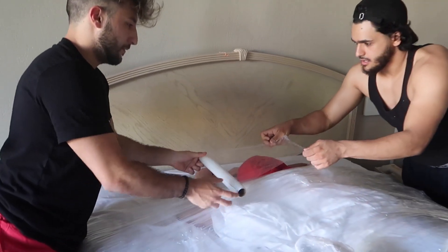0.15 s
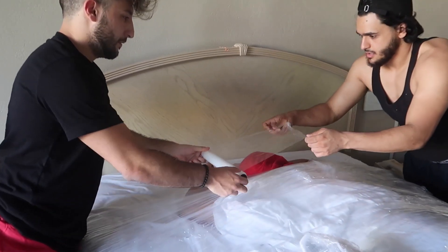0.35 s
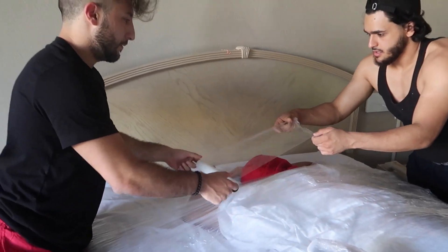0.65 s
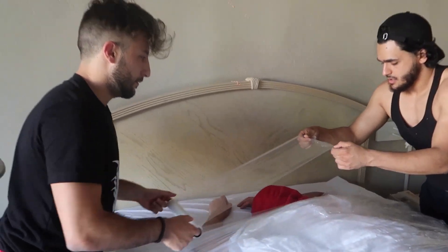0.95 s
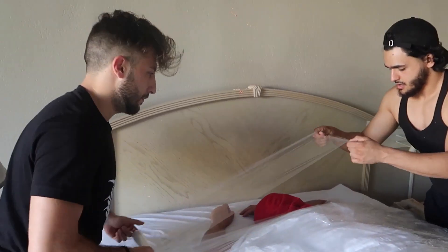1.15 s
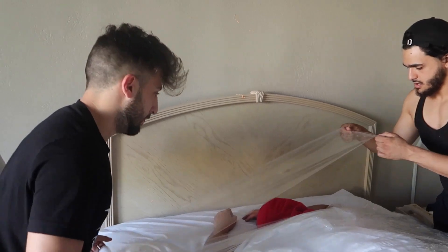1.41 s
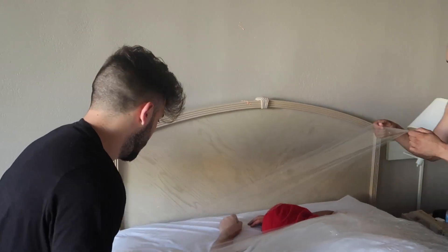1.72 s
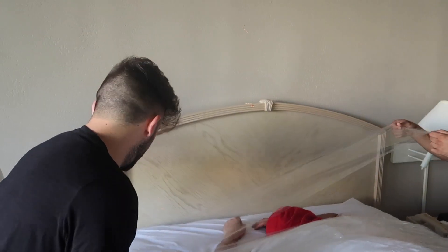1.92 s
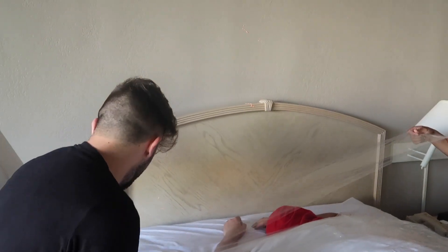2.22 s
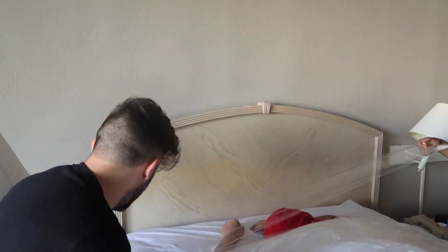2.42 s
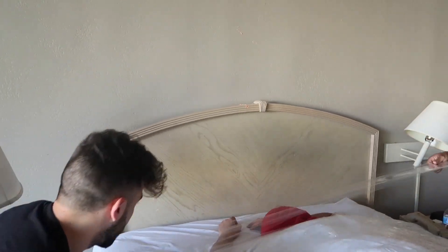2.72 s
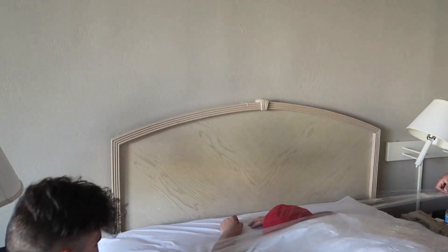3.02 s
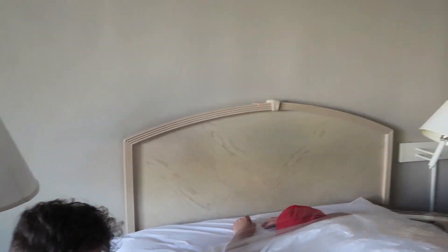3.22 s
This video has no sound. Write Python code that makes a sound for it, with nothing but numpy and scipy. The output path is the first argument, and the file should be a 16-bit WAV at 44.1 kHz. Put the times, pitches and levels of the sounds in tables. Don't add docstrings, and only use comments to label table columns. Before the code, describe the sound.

Plastic wrap crackles lightly as it is pulled from a roll, then bedding shifts dully, the cardboard roll knocks softly, and sharper snaps close it; close stereo microphone, small soft room with a low hum.

```python
import sys
import numpy as np
from scipy import signal
from scipy.fft import rfft, irfft, next_fast_len
from scipy.io import wavfile
from scipy.ndimage import uniform_filter1d, map_coordinates

SR = 44100
rng = np.random.default_rng(int(sys.argv[2]) if len(sys.argv) > 2 else 0)


def decibels_to_gain(level_db):
    exponent = np.asarray(level_db, float) / 20
    return 10 ** exponent


def log_audio(samples):
    frames = np.atleast_2d(samples).T
    limited = np.clip(frames, -1, 1)
    pcm = np.round(limited * 32767).astype(np.int16)
    wavfile.write(sys.argv[1], SR, pcm)


N = 147735


def unit(x):
    return x / np.sqrt(np.mean(x ** 2) + 1e-20)


def along(points, hz):
    f, v = np.transpose(points)
    return np.interp(np.log(hz + 1), np.log(f + 1), v)


def wobble(rate):
    return map_coordinates(rng.standard_normal(200), [np.arange(N) * min(rate, 50) / SR])


def rush(gain):
    # f/Hz, likeness (0 to 1)
    likeness = [(100, 1), (300, 0.88), (600, 0.9), (1300, 0.6), (2800, 0.39), (6000, 0.061), (12000, 0.045)]
    m = next_fast_len(N + 8192)
    hz = np.fft.rfftfreq(m, 1 / SR)
    turn = np.arccos(np.clip(along(likeness, hz), 0, 1)) / 2
    noise = rfft(rng.standard_normal((2, m))) * gain(hz)
    mid, side = irfft(noise * [np.cos(turn), np.sin(turn)], m)[:, :N]
    return unit(np.array([mid + side, mid - side]))


def patches(x):
    patchy_db = 1.1
    z = signal.stft(x, nperseg=512)[2]
    field = rng.standard_normal(z.shape[1:])
    field = uniform_filter1d(field, size=5, axis=0)
    field = uniform_filter1d(field, size=10, axis=1)
    return signal.istft(z * decibels_to_gain(patchy_db * unit(field)), nperseg=512)[1][:, :N]


def grains(s, gain, hz, octaves, cycles, size_db, skew_s):
    biggest, lean = 0.985, 0.41
    u, g = rng.random((2, len(s))), rng.standard_normal((3, len(s)))
    f = np.clip(hz * 2 ** (octaves * g[0]), 200, 14500)[:, None]
    size = -size_db * np.log(1 - biggest * u[0])
    t, out = np.arange(300) / SR, []
    start = np.clip(np.round(s * SR).astype(int), 0, N)[:, None] + np.arange(300)
    fade = np.exp(-t * f / cycles) * np.sqrt(f * 4 / (SR * cycles))
    for side in (1, -1):
        late = t + 2 * skew_s + side * skew_s * np.tanh(0.5 * g[1] - lean)[:, None]
        wave = np.sin(2 * np.pi * (f * late + u[1][:, None])) * fade
        wave = wave * (gain * unit(decibels_to_gain(size)) * decibels_to_gain(side * 0.27 * g[2]))[:, None]
        out.append(np.bincount(start.ravel(), wave.ravel(), N + 300)[:N])
    return np.array(out)


def clumps(rows, count, **shape):
    s, half, db, hz = np.transpose(rows)[:, :, None] * np.ones(count)
    s = s + half * rng.standard_normal(s.shape) * 0.7
    gain = decibels_to_gain(db) * np.sqrt(2 * half * SR / count)
    return grains(s.ravel(), gain.ravel(), hz.ravel(), **shape)


def machine_hum():
    # multiple of the shaft speed, level/dB
    shaft_orders = [(1, -60), (2, -54), (4, -40.5), (5, -46.5), (6, -55.5), (7, -51.5), (8, -52.5),
                    (9, -58), (10, -51), (11, -52.5), (12, -62), (13, -67), (15, -94), (18, -68)]
    # t/s, level/dB
    swell = [(0, -8.5), (.2, -0.5), (.45, -28), (.65, 1), (.82, -5), (.95, 1.5), (1.2, -9), (1.4, 2.5),
             (1.75, 2.5), (2.05, -7.5), (2.4, 2), (2.75, 2), (2.84, -10), (2.97, 1), (3.08, -9),
             (3.2, -3.5), (3.35, -12)]
    shaft_hz, mains_hz, mains_db, unsteady_db = 28.27, 118.15, -47.5, 1.5
    t = np.arange(N) / SR
    swell_db = np.interp(t, *np.transpose(swell))
    lines = [(k * shaft_hz, db) for k, db in shaft_orders] + [(mains_hz, mains_db)]
    hum = np.zeros(N)
    for hz, db in lines:
        loudness = db + 3.5 + unsteady_db * wobble(2.55) + swell_db * (hz == 4 * shaft_hz)
        hum += decibels_to_gain(loudness) * np.sin(2 * np.pi * (hz * t + rng.random()) + 0.26 * wobble(1.6))
    return hum


def machine_air():
    # f/Hz, width/Hz, level/dB
    resonances = [(59, 8.8, -10), (89.4, 30, 2), (117, 14.6, 3), (168, 36.6, -2), (288, 117, -8),
                  (328.5, 10.6, 0.5), (369, 20, -6.5), (438, 21.5, -5.5), (486.6, 20, -7), (593, 54, -11.5),
                  (766, 185, -21.5)]
    # f/Hz, level/dB per Hz
    hiss_colour = [(20, -15), (40, -12), (200, -2.5), (700, -13.5), (1500, -20), (4000, -26.5),
                   (10000, -35), (15000, -37)]
    duct_db, hiss_db = -41.5, -46

    def duct_gain(f):
        return np.sqrt(sum(decibels_to_gain(2 * db) / (1 + (2 * (f - c) / w) ** 4) for c, w, db in resonances))

    duct = rush(duct_gain)
    hiss = rush(lambda f: decibels_to_gain(along(hiss_colour, f))) * decibels_to_gain(0.92 * wobble(6.39))
    return patches(decibels_to_gain(duct_db) * duct + decibels_to_gain(hiss_db) * hiss)


def bedding():
    # t/s of the centre, half length/s, level/dB, f/Hz
    shifts = [(.97, 0.09, -57.5, 1094), (1.25, 0.062, -55, 2030), (1.53, 0.027, -67, 1000),
              (1.585, .025, -48, 784), (1.65, 0.023, -49, 880), (1.725, .04, -47, 970),
              (1.77, 0.055, -54, 2050), (2.25, 0.044, -55, 2290), (2.3, .03, -59, 1900),
              (1.14, .03, -58, 1900), (2.435, 0.015, -58, 1110), (2.51, 0.046, -63, 826)]
    return clumps(shifts, count=400, octaves=0.5, cycles=1.4, size_db=3.5, skew_s=8e-5)


def roll_knocks():
    # t/s, peak level/dB
    knocks = [(1.707, -37), (2.424, -31.5), (2.772, -31)]
    # f/Hz, level/dB, time to fall 60 dB/s
    roll_tones = [(417, -10, 0.044), (785, 0.5, 0.034), (857, -6, 0.071), (1500, -13, 0.026),
                  (1900, -13, 0.019)]
    rise_s = 0.002
    x, t = np.zeros(N + SR), np.arange(4000) / SR
    for s, db in knocks:
        ring = np.zeros(len(t))
        for hz, tone_db, t60 in roll_tones:
            loudness = db + tone_db + rng.normal(0, 3.1) - 60 * t / t60
            ring += decibels_to_gain(loudness) * np.sin(2 * np.pi * hz * t)
        x[round(s * SR):][:len(t)] += ring * (1 - np.exp(-t / rise_s))
    return x[:N]


def crease_rings():
    # t/s of the centre, half length/s, level/dB, f/Hz
    rings = [(.495, 0.0025, -54, 4200), (.496, .0012, -61, 9200), (.475, .001, -61, 9200),
             (.64, .003, -58, 2430), (0.837, .002, -60, 3550), (1.134, .002, -61, 3400),
             (1.385, .004, -62, 3550), (1.713, 0.0062, -43, 730), (2.235, .004, -52, 1450),
             (2.272, .003, -47.5, 784), (2.68, .002, -52, 5530), (2.732, .0008, -49, 9000),
             (2.77, 0.0033, -47, 1040), (2.795, 0.0043, -49, 1910), (2.88, .0012, -58, 9800),
             (2.908, .0015, -49, 3900), (2.919, .0012, -54, 5700), (2.921, .002, -46, 2140),
             (3.02, .004, -50, 2650), (3.021, .001, -48, 7900), (3.078, 0.0011, -45, 9600)]
    bend_octaves = 0.03
    out, t = np.zeros(N), np.arange(N) / SR
    for s, half, db, hz in rings:
        near = slice(round((s - 0.05) * SR), round((s + 0.05) * SR))
        u = (t[near] - s) / half
        bend, phase = rng.standard_normal(2)
        turns = hz * half * u * (1 + bend_octaves * bend * u / 10)
        out[near] += decibels_to_gain(db + 5.5) * np.exp(-u ** 2 / 2) * np.sin(2 * np.pi * turns + 3 * phase)
    return out


def peel_rustle(count=9000):
    # t/s, level/dB
    pull = [(0, -55), (.11, -63), (.2, -91), (.33, -57.5), (.62, -60), (.71, -64), (.8, -56), (1.0, -61),
            (1.18, -56.5), (1.26, -55), (1.34, -57), (1.42, -58), (2.0, -78), (2.62, -68), (2.75, -52),
            (2.84, -56), (2.89, -47.5), (2.92, -50.5), (2.95, -43), (2.99, -51), (3.12, -52.5),
            (3.22, -51.5), (3.35, -53)]
    flutter_db = 2.8
    s = rng.random(count) * N / SR
    when, db = np.transpose(pull)
    flutter = wobble(25.03)[(s * SR).astype(int)]
    gain = decibels_to_gain(np.interp(s, when, db) - 3.0 + flutter_db * flutter) * np.sqrt(N / count)
    return grains(s, gain, hz=4670, octaves=0.83, cycles=0.44, size_db=0.5, skew_s=3e-5)


def sharp_snaps():
    # t/s, level/dB, f/Hz
    snaps = [(.398, -53, 3000), (0.495, -48, 3300), (.567, -54, 7500), (0.606, -53, 7500),
             (0.613, -53, 3200), (.621, -53, 3200), (1.569, -54, 900), (1.647, -44, 900),
             (1.706, -45.5, 1900), (2.425, -49, 1500), (2.677, -58, 5200), (2.683, -55, 5500),
             (2.725, -54, 6900), (2.733, -55, 7000), (2.763, -45, 7500), (2.768, -43, 3000),
             (2.775, -44, 8000), (2.783, -46, 6000), (2.905, -49, 6000), (2.912, -38, 1500),
             (2.917, -41, 6500), (2.963, -52, 7500), (2.971, -39, 1800), (3.015, -46, 5960),
             (3.021, -39, 6500), (3.073, -42, 2300), (3.078, -37, 5000), (3.085, -45, 2200),
             (3.127, -42, 6040), (3.136, -47, 2800), (3.2, -51, 2800), (3.205, -52, 7000)]
    half_s = 0.0008
    rows = [(s, half_s, db, hz) for s, db, hz in snaps]
    return clumps(rows, count=16, octaves=0.97, cycles=0.74, size_db=4.5, skew_s=2e-5)


def crackle_bursts():
    # t/s of the centre, half length/s, level/dB, f/Hz
    bursts = [(0.018, 0.019, -57.5, 2880), (0.087, 0.037, -58, 4000), (0.339, 0.014, -57.5, 3500),
              (0.399, 0.0056, -50, 3670), (0.426, 0.0069, -53.5, 4020), (.495, .004, -49, 6500),
              (0.512, 0.0055, -54, 7000), (0.57, 0.0078, -53.5, 7500), (0.611, 0.0078, -53.5, 7800),
              (0.621, .011, -49.5, 2960), (0.791, 0.0066, -57.5, 4140), (1.331, .012, -57, 6060),
              (2.683, 0.0058, -50, 5440), (2.703, 0.0051, -65, 9700), (2.733, 0.0035, -49.5, 8300),
              (2.757, .003, -50, 7000), (2.769, 0.007, -41.5, 7640), (2.78, 0.0053, -56, 8000),
              (2.81, 0.022, -55, 2000), (2.876, 0.0049, -50, 9000), (2.904, 0.0052, -46.5, 6030),
              (2.915, 0.0084, -43.5, 6200), (2.941, 0.013, -59, 5100), (2.967, 0.0037, -42.5, 6900),
              (3.022, 0.0046, -46.5, 6300), (3.077, 0.0057, -44.5, 7600), (3.092, 0.0028, -59, 2950),
              (3.131, 0.0061, -48, 5840), (3.207, 0.0051, -50, 5340)]
    body_hz, body_db, body_grows = 1850, -3, 1.75
    body = []
    for s, half, db, hz in bursts:
        thud_db = body_db - 45.0 + body_grows * (db + 45.5)
        body.append((s + 0.0019, half * 1.2, thud_db, body_hz))
    snaps = clumps(bursts, count=90, octaves=0.6, cycles=1, size_db=2, skew_s=4e-5)
    return snaps + clumps(body, count=50, octaves=0.66, cycles=3.9, size_db=-2.0, skew_s=5e-5)


def room(x):
    # f/Hz, time to fall 60 dB/s
    decay = [(300, 0.69), (2000, 0.25), (10000, 0.29)]
    hz, t, z = signal.stft(rng.standard_normal((2, SR // 2)), SR, nperseg=256)
    tail = signal.istft(z * decibels_to_gain(-60 * t / along(decay, hz)[:, None]), SR, nperseg=256)[1]
    tail = np.array([tail[0] + 0.22 * tail[1], tail[0] - 0.16 * tail[1]])
    tail = tail / np.linalg.norm(tail[0])
    delayed = np.pad(x.mean(0), (200, 0))[None]
    return signal.fftconvolve(delayed, tail, axes=1)[:, :N]


def scene():
    room_db, ring_to_room_db = -6.5, -9
    machine = machine_hum() + machine_air()
    handling = bedding() + roll_knocks()
    rings = crease_rings()
    film = peel_rustle() + sharp_snaps() + crackle_bursts()
    near = handling + film
    echo = room(near + decibels_to_gain(ring_to_room_db) * rings)
    return near + rings + decibels_to_gain(room_db) * echo + machine


def band_limit(x):
    return signal.sosfilt(signal.butter(12, 15290, fs=SR, output="sos"), x)


def record(dry):
    # f/Hz, level/dB
    mic = [(8000, 0), (10500, 1.5), (12500, -3.5), (14000, -10), (15500, -8.5)]
    top_hz, side_cut_hz = 15250, 320
    hz = np.fft.rfftfreq(N, 1 / SR)
    response = decibels_to_gain(along(mic, hz)) * (hz < top_hz)
    mid, side = rfft([dry[0] + dry[1], dry[0] - dry[1]]) * response / 2
    side = side / np.sqrt(1 + (side_cut_hz / (hz + 1)) ** 4)
    return band_limit(irfft([mid + side, mid - side], N))


dry = scene()
out = record(dry)
log_audio(out)
```